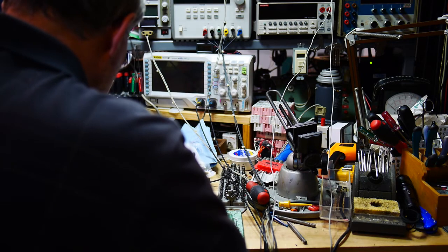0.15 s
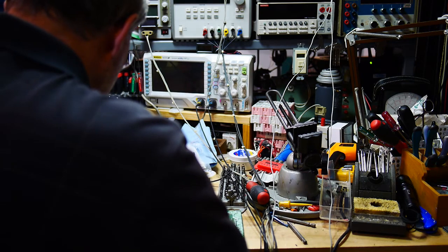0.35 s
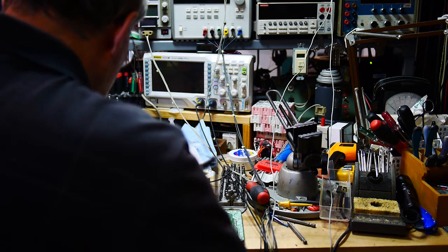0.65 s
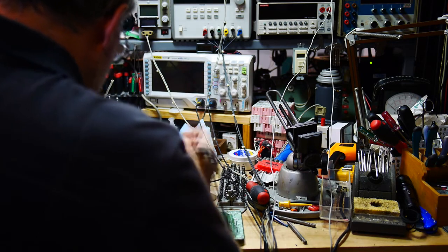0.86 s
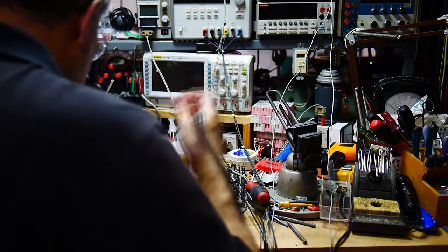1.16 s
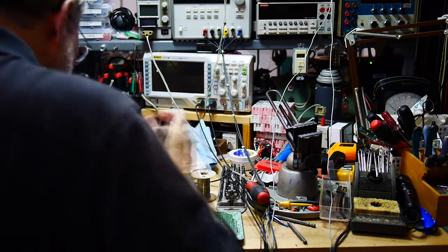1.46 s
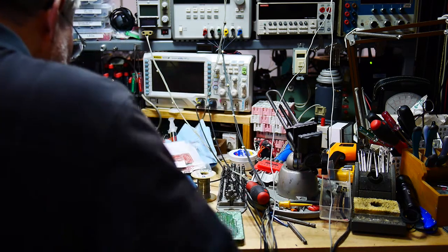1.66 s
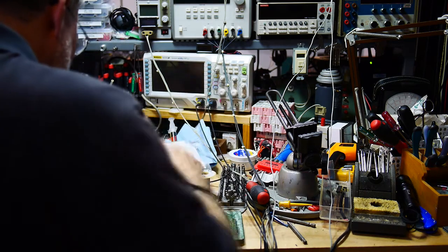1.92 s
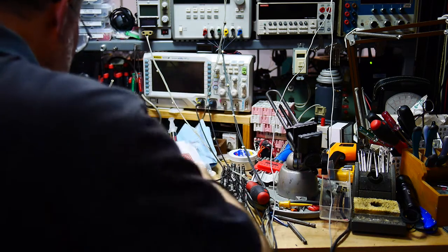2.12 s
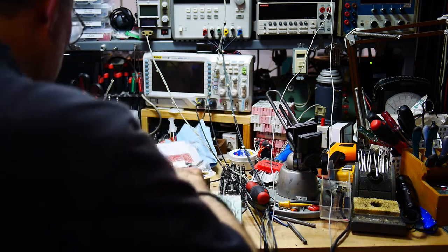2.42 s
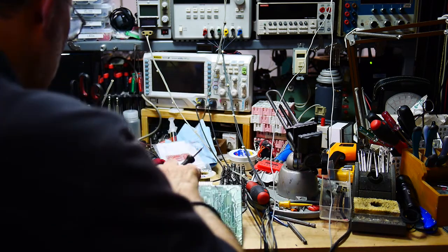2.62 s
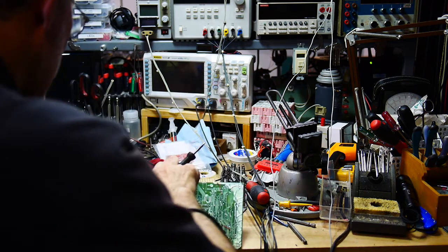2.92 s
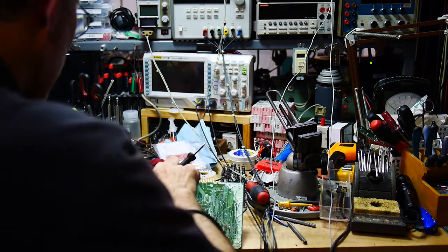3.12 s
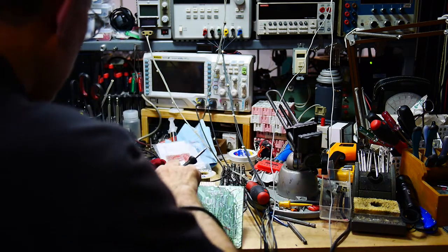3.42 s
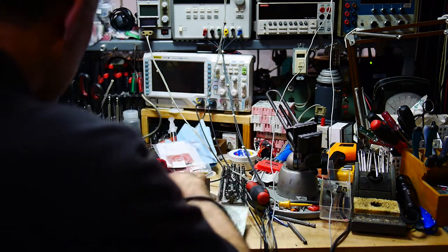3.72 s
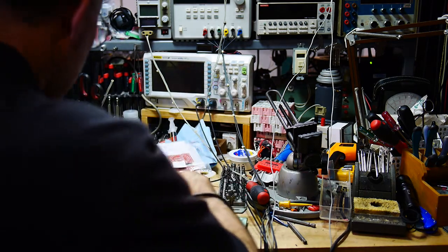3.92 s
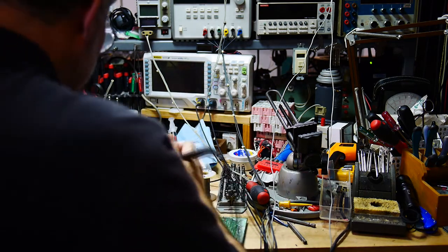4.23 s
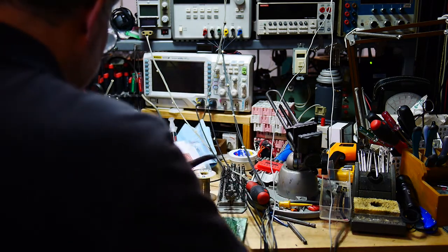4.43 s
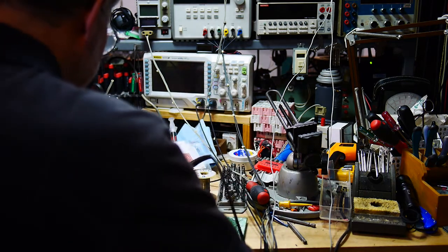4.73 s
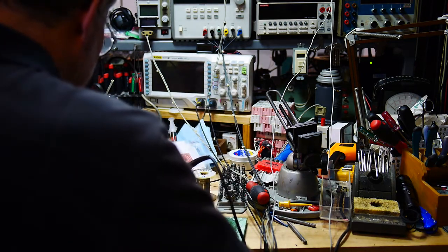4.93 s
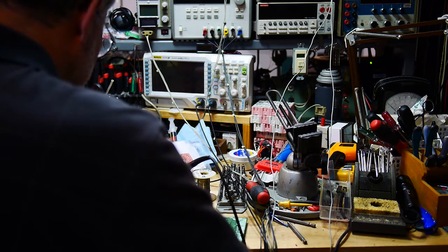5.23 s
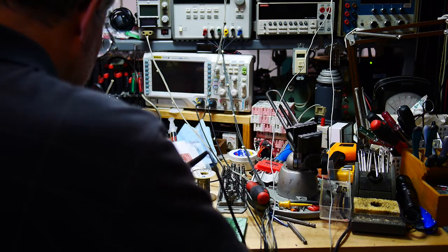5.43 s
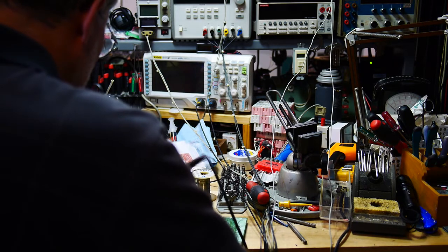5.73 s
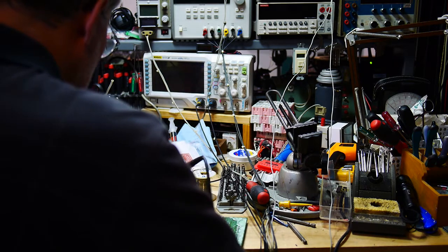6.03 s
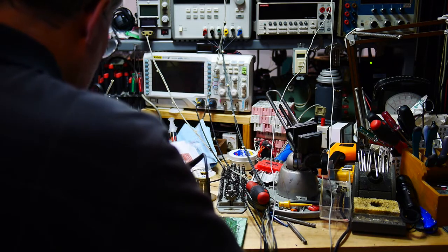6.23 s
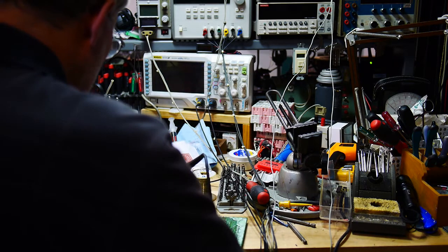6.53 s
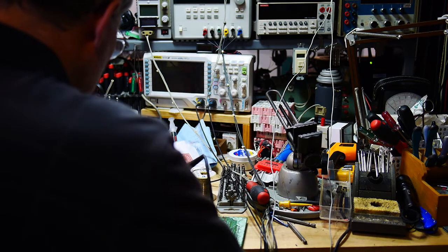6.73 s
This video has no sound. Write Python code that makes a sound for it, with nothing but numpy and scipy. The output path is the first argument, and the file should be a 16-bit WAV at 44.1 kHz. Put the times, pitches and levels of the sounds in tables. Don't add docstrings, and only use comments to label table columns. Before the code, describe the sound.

Sharp plastic-and-metal pump snap, hissing plunger push and very loud click, wooden knocks and scrapes on a bench, quiet pause, final snap.

```python
import sys
import numpy as np
from scipy import signal
from scipy.fft import rfft, irfft, next_fast_len
from scipy.io import wavfile
from scipy.ndimage import map_coordinates

SR = 44100
rng = np.random.default_rng(int(sys.argv[2]) if len(sys.argv) > 2 else 0)


def attenuation_scalar(level_db):
    decades = np.asarray(level_db, float) / 20
    return 10 ** decades


def master_out(mix):
    frames = np.transpose(np.atleast_2d(mix))
    ceiling = np.clip(frames, -1, 1)
    pcm = np.round(ceiling * 32767).astype(np.int16)
    wavfile.write(sys.argv[1], SR, pcm)


N = 302550
TAIL_N = 16384
PUMP_GROUPS = [(1800, 7500), (0, 1800), (7500, SR)]

# centre_hz, width_hz, level_db
BENCH_MODES = [(254, 72, -14.5), (400, 46, 0.3), (538, 100, 8.5), (690, 200, 6.5), (846, 360, 10.5),
               (1221, 120, 1.5), (1440, 250, -15), (2050, 360, -20.5), (2530, 340, -19), (3370, 160, -24),
               (4350, 460, -33.5)]
# centre_hz, width_hz, level_db
KNOB_MODES = [(400, 1400, -1.5), (800, 230, 4), (1310, 400, -7), (1880, 360, -6.5), (2900, 370, 1),
              (4200, 640, -7.5), (5400, 720, -6.5), (5940, 906, -3), (8550, 1480, -18), (9800, 1200, -4),
              (12200, 1500, -6)]


def unit(x):
    return x / np.sqrt(np.mean(x ** 2) + 1e-20)


def along(points, hz):
    f, v = np.transpose(points)
    return np.interp(np.log(hz + 1), np.log(f + 1), v)


def curve(points, outside=None):
    s, v = np.transpose(points)
    return np.interp(np.arange(N) / SR, s, v, outside, outside)


def wobble(rate):
    knots = rng.standard_normal(int(N * rate / SR) + 4)
    return map_coordinates(knots, [np.arange(N) * rate / SR])


def swell(peak_s, db, rise_s, fall_s):
    t = np.arange(N) / SR - peak_s
    return attenuation_scalar(db - 30 * np.maximum(-t / rise_s, t / fall_s))


def filtered(x, response):
    n = x.shape[-1]
    m = 2 * next_fast_len(n // 2 + 4096)
    return irfft(rfft(x, m) * response(np.fft.rfftfreq(m, 1 / SR)), m)[..., :n]


def body(modes):
    def response(f):
        power = sum(attenuation_scalar(2 * db) * (f * w) ** 2 / ((c * c - f * f) ** 2 + (f * w) ** 2) for c, w, db in modes)
        above = 1 + (f / (1.135 * modes[-1][0])) ** 6
        below = 1 + (0.7 * modes[0][0] / (f + 1)) ** 4
        power /= above * below
        cepstrum = irfft(np.log(power + 1e-12) / 2, 2 * len(f) - 2)
        cepstrum[1:len(f) - 1] *= 2
        cepstrum[len(f):] = 0
        return np.exp(rfft(cepstrum))
    return response


def rush(spectrum):
    # frequency_hz, likeness
    alike = [(60, 0.81), (150, 0.69), (380, 0.44), (950, 0.66), (2380, 0.54), (5980, 0.16), (15000, -0.22)]
    # frequency_hz, lead_rad
    lead = [(20, 0), (150, -.1), (600, -.43), (1200, -.85), (2400, -1.7), (5000, -2)]

    def mid_side(hz):
        turn = np.arccos(np.clip(along(alike, hz), -1, 1)) / 2
        return attenuation_scalar(along(spectrum, hz)) * np.array([np.cos(turn), np.sin(turn)])

    mid, side = filtered(rng.standard_normal((2, N)), mid_side)
    pair = np.array([mid + side, mid - side])
    return unit(filtered(pair, lambda hz: np.exp(.5j * along(lead, hz) * [[1], [-1]])))


def shop(near, spread, pan_db, wet_db):
    # frequency_hz, likeness
    coherence = [(100, .9), (700, 1), (2500, 0.3), (6000, 0.95), (12000, .6)]
    # frequency_hz, t60_s
    t60 = [(200, 0.66), (1000, 0.24), (4000, 0.31), (14000, .22)]
    # delay_s, level_db
    walls = [(.0045, -6), (.009, -11), (.014, -11), (.019, -13), (.027, -15)]
    # frequency_hz, share of the left-right dB
    shadow = [(700, 0.5), (3000, -0.77), (6000, 2.8), (13000, 3)]
    hz, t, z = signal.stft(rng.standard_normal((2, TAIL_N)), SR, nperseg=256)
    turn = np.arccos(np.clip(along(coherence, hz), -1, 1))[:, None] / 2
    z = np.cos(turn) * z[0] + np.sin(turn) * z[1] * [[[1]], [[-1]]]
    decay = attenuation_scalar(-60 * t / along(t60, hz)[:, None])
    tail = signal.istft(z * decay, SR, nperseg=256)[1][:, :TAIL_N]
    build_up = 1 - np.exp(-np.arange(TAIL_N) / (0.0032 * SR))
    tail *= attenuation_scalar(wet_db) / np.linalg.norm(tail[0]) * build_up
    early = np.zeros_like(tail)
    early[:, 0] = 1
    for delay_s, db in walls:
        early[[0, 1], round(delay_s * SR) + rng.integers(0, 4, size=2)] += attenuation_scalar(db)
    heard = signal.fftconvolve(near[None], early, axes=1) + signal.fftconvolve(spread[None], tail, axes=1)
    return filtered(heard, lambda hz: attenuation_scalar(pan_db / 2 * along(shadow, hz) * [[1], [-1]]))


def strikes(rows, modes, groups, scuff_s, pan_db, wet_db, trim_db):
    out = np.zeros((2, N + 2 * TAIL_N))
    t = np.arange(TAIL_N // 8) / SR
    impulse = 1. * (t == 0)
    rings = [filtered(impulse, body([m for m in modes if lo <= m[0] < hi])) for lo, hi in groups]
    rise = max(scuff_s, .002) / 9
    for s, db, *shares_db in rows:
        grit = rng.standard_normal(len(t)) * attenuation_scalar(2.7 * rng.standard_normal(len(t)))
        scuff = grit * (t / rise) ** 1.36 * np.exp(-1.3 * t / rise)
        blow = np.linalg.norm(scuff) * (np.arange(len(t)) == round(rise * SR))
        near_and_spread = 0
        for ring, share_db in zip(rings, [0, *shares_db]):
            part = signal.fftconvolve(np.array([scuff, blow]), ring[None], axes=1)
            near_and_spread = near_and_spread + attenuation_scalar(db + share_db + trim_db) * part / np.abs(part[0]).max()
        heard = shop(*near_and_spread, pan_db, wet_db)
        out[:, round((s - .7 * rise) * SR):][:, :heard.shape[1]] += heard
    return out[:, :N]


def rumble(bustle_db):
    # frequency_hz, level_db
    low_spectrum = [(12, -42.5), (20, -1.5), (32, -8), (54, 8.5), (91, 5), (105, -1.5), (140, -38),
                    (230, -120)]
    # peak_s, level_db
    jolts = [
        (.445, -53.5),
        (1.63, -62),
        (6.645, -61),
    ]
    thud = sum(swell(s, db, rise_s=.06, fall_s=.25) for s, db in jolts)
    steady = attenuation_scalar(-66.5 + bustle_db + 2.2 * wobble(6.9))
    return (steady + thud) * rush(low_spectrum)


def mains_hum(bustle_db):
    t = np.arange(N) / SR
    tone = np.sin(2 * np.pi * 120 * t + .7 * wobble(1.3)) * attenuation_scalar(3.4 * wobble(5.2))
    band = rush([(85, -36.5), (105, -9), (140, -1.5), (170, -33.5)])
    return attenuation_scalar(-69 + 0.84 * bustle_db) * (tone + 1.3 * band)


def fan_whirr(bustle_db):
    # frequency_hz, level_db
    whirr_spectrum = [(82, -57), (140, -21), (179, -5), (246, -5.5), (266, -6.5), (306, -2.5), (326, -4.5),
                      (366, -3.5), (559, -7.5), (612, -7), (1430, -10.5), (3000, -20.5), (3900, -53),
                      (6600, -120)]
    t = np.arange(N) / SR
    blade = attenuation_scalar(-18.5 + 1.2 * wobble(2.6)) * np.sin(2 * np.pi * 187 * t + 1.3 * wobble(7.3))
    return attenuation_scalar(-51.5 + 0.08 * bustle_db + .5 * wobble(3)) * (rush(whirr_spectrum) + blade)


def hiss(bustle_db):
    # frequency_hz, level_db
    hiss_spectrum = [(1180, -28.5), (2000, -6), (2610, -9), (3200, -9), (3520, -8.5), (5310, -10.5),
                     (6580, -9), (8220, -15.5), (9840, -13.5), (12800, -24.5), (15500, -31.5)]
    # peak_s, level_db, rise_s, fall_s
    hiss_lift = (2.37, -53, .15, 0.02)
    return (attenuation_scalar(-57.5 + .35 * bustle_db) + swell(*hiss_lift)) * rush(hiss_spectrum)


def fans():
    # time_s, level_db
    bustle = [(0, 1.5), (1.1, -0.5), (2.1, -1), (2.7, 2.5), (3.1, -4), (4.2, -4), (4.6, -9.5), (6.3, -15),
              (6.86, -4.5)]
    bustle_db = curve(bustle)
    return rumble(bustle_db) + mains_hum(bustle_db) + fan_whirr(bustle_db) + hiss(bustle_db)


def trigger():
    # start_s, peak_db, low_body_db, high_ring_db
    presses = [
        (0.3145, -16, -23, -4),
        (6.5405, -17, -20, -10.5),
    ]
    # centre_hz, width_hz, level_db
    button_modes = [(920, 100, -9), (2240, 570, 1.5), (2680, 300, 9.5), (4160, 130, 10), (4850, 150, 7),
                    (6060, 390, 8.5), (9600, 1700, 37), (13000, 990, -19.5)]
    return strikes(presses, button_modes, PUMP_GROUPS, scuff_s=.028, pan_db=1.5, wet_db=0.5, trim_db=-6)


def piston_slam():
    # start_s, peak_db, top_modes_db, rod_ring_db
    slams = [
        (0.4067, -15, 0.5, 5),
        (6.6235, -14.5, -1, -1.6),
    ]
    # delay_s, level under the slam_db, low_body_db, rod_ring_db, hollow_note_db
    rebounds = [(.003, -4.5, 0.5, -17, 4.5), (0.0103, -4.5, -27, -3.5, -25.5),
                (.018, 2.5, -15.5, -14.5, -3), (.0243, -3.5, -12.5, 2.5, -20.5),
                (.033, -12, -5.5, -2.5, -15), (0.048, -15, -11.5, -11, -25)]
    # centre_hz, width_hz, level_db
    barrel_modes = [(150, 116, -16.5), (380, 66, -7.5), (535, 57, -4), (875, 310, 1), (1268, 85, -6.5),
                    (2130, 260, -12.5), (2510, 150, -8), (2885, 110, -8.5), (3630, 1400, -3),
                    (4830, 890, -5.5), (5900, 800, -3.5), (7900, 3800, -22), (9570, 390, -12),
                    (10500, 570, -13.5), (11900, 1100, -18.5), (12960, 1000, -27)]
    groups = [(1800, 9000), (0, 1800), (9000, 10000), (10000, SR), (1800, 3200)]
    hits, bounces = [], []
    for s, db, top_db, ring_db in slams:
        hits.append((s, db, -5.5, -11.5 + ring_db, -11.5 + top_db, -17.5))
        for delay_s, under_db, low_db, rod_db, hollow_db in rebounds:
            bounces.append((s + delay_s, db + under_db, low_db, rod_db + ring_db, -11.5 + top_db, hollow_db))
    first = strikes(hits, barrel_modes, groups, scuff_s=.038, pan_db=3.0, wet_db=3.2, trim_db=-2.1)
    return first + strikes(bounces, barrel_modes, groups, scuff_s=.011, pan_db=0.8, wet_db=-2.0, trim_db=3.6)


def tool_ticks():
    # start_s, peak_db, low_body_db, high_ring_db, edge_db
    ticks = [(0.6355, -32.5, -4, -19, -6), (0.6938, -48.5, -7, 10, 13), (4.0165, -29.5, 1, -35, -19),
             (4.26, -37, 1, -1, -9), (4.67, -46, 5, -22.5, -17.5), (4.829, -27.5, -2, -26, -14),
             (4.839, -40, 11, -33, -17), (5.1243, -36, 3.5, -27, -19), (5.2126, -35, -0.5, -18, -13),
             (6.365, -41.5, -0.5, -17, -9)]
    # centre_hz, width_hz, level_db
    tool_modes = [(816, 150, -28), (1260, 220, -6), (1710, 910, -4), (2310, 200, -3.5), (4340, 590, -16),
                  (5140, 810, 6), (6240, 330, 8)]
    groups = [(1500, 3000), (0, 1500), (5600, SR), (3000, 5600)]
    return strikes(ticks, tool_modes, groups, scuff_s=.027, pan_db=2.0, wet_db=-3.0, trim_db=-5.0)


def rubbing():
    # firmest_s, level_db, rise_s, fall_s, rasp_db
    rubs = [(.644, -54.5, 0.14, 0.026, 4), (.72, -42.5, 0.082, 0.046, -6.5), (.78, -49.5, 0.015, 0.25, -25),
            (.932, -54, .012, .056, -9), (2.6, -51, 0.073, 0.21, -19), (2.684, -51.5, 0.24, 0.42, -23),
            (3.645, -44.5, 0.11, 0.14, -11.5), (3.69, -45.5, 0.15, 0.049, -30),
            (3.876, -34.5, 0.031, 0.04, -16), (4.06, -53, .015, .9, -29.5), (4.19, -47, .015, 0.034, -37),
            (4.276, -60, .05, 0.43, -29.5), (4.368, -49.5, 0.18, 0.041, -32)]
    # centre_hz, width_hz, level_db
    solder_modes = [(3550, 250, 0), (4150, 250, -2), (6200, 1800, -14), (11000, 4000, -17)]

    def grain():
        return rng.standard_normal(N) * attenuation_scalar(2.7 * wobble(90))

    rub = sum(swell(*row[:4]) for row in rubs)
    rasp = sum(attenuation_scalar(row[4]) * swell(*row[:4]) for row in rubs)
    wood = unit(filtered(grain(), body([mode for mode in BENCH_MODES if mode[0] < 2200])))
    grit = unit(filtered(grain(), body(solder_modes)))
    sound = attenuation_scalar(-3.5) * (rub * wood + rasp * grit)
    return shop(sound, sound, pan_db=1.5, wet_db=1.5)[:, :N]


def bench_knocks():
    # start_s, peak_db, middle_db, edge_db
    knocks = [(0.696, -26, -10, -4.5), (0.783, -33.5, -7, -8), (0.93, -40, -2, -8), (1.531, -46, -12, 3),
              (1.557, -42, -17, 2), (1.879, -23.5, -17, 1), (1.898, -39.5, 12, 0),
              (2.179, -16.5, -0.5, -5.5), (2.184, -13, -7, -12), (2.192, -19.5, -14, -4.5),
              (2.197, -26, -14, -22), (2.236, -24, 1, -7), (2.254, -25, -11, -9.5), (2.299, -44, 9.5, -3),
              (2.655, -47, -18, -23), (3.689, -23.5, -24, -37), (3.897, -23, 1.5, -34.5),
              (3.901, -25, -17, -16), (4.019, -32, 3, -3.5), (4.05, -34, -12, -13),
              (4.188, -36.5, -2.5, -6), (4.279, -32.5, -4, -14), (4.354, -36, -4, -14),
              (4.525, -39.5, -3, -12)]
    groups = [(0, 1000), (1000, 1800), (1800, SR)]
    return strikes(knocks, BENCH_MODES, groups, scuff_s=.024, pan_db=-1.7, wet_db=-1.5, trim_db=-3.0)


def piston_air():
    # time_s, level_db
    strokes = [
        [(1.44, -65), (1.486, -37), (1.49, -54)],
        [(1.53, -37), (1.584, -50), (1.606, -41), (1.616, -23.5), (1.618, -46)],
        [(1.795, -33), (1.805, -32.5), (1.827, -27.5), (1.895, -34), (1.931, -62), (1.98, -65)],
    ]
    # frequency_hz, level_db
    air_spectrum = [(410, -34), (700, -13.5), (1090, -5.5), (1370, -15.5), (2000, -8), (3490, -5),
                    (5860, -1), (13400, -8), (15500, -29)]
    push = sum(attenuation_scalar(curve(points, -120)) for points in strokes)
    resonance = body(KNOB_MODES)

    def colour(hz):
        return attenuation_scalar(along(air_spectrum, hz)) * (1 + 1.9 * np.abs(resonance(hz)))

    air = unit(filtered(rng.standard_normal(N), colour))
    sound = attenuation_scalar(-3.5) * push * air * attenuation_scalar(1.9 * wobble(250))
    return shop(sound, sound, pan_db=1.5, wet_db=1.5)[:, :N]


def thumb_grip():
    # start_s, peak_db, low_body_db, high_ring_db
    grips = [
        (1.493, -20.5, 1.5, -3),
        (1.4961, -13.5, -12, -1),
    ]
    return strikes(grips, KNOB_MODES, PUMP_GROUPS, scuff_s=0.0067, pan_db=1.46, wet_db=0.0, trim_db=-3.5)


def latch():
    # start_s, peak_db, low_body_db, high_ring_db
    clicks = [(1.6219, -1, -15.5, -28), (1.6258, -1.5, -37.5, -3), (1.6408, -14, -10.5, -23.5)]
    # centre_hz, width_hz, level_db
    held_modes = [(350, 140, -11), (750, 280, -13), (1172, 160, -4), (1970, 400, -8), (2550, 280, -7),
                  (3097, 900, -5.5), (4170, 210, -5.5), (5030, 220, -6.5), (5850, 380, 1.7),
                  (6900, 4500, -19), (8610, 380, -9.5), (9560, 300, -1.5), (11500, 2700, -12),
                  (13200, 880, -5.5)]
    return strikes(clicks, held_modes, PUMP_GROUPS, scuff_s=.007, pan_db=1.2, wet_db=-0.7, trim_db=-0.6)


def knob_return():
    # start_s, peak_db, low_body_db, high_ring_db
    returns = [(1.7798, -20, -6.5, -19), (1.7838, -11, -15.5, -9), (2.0078, -32.5, -8, -28)]
    return strikes(returns, KNOB_MODES, PUMP_GROUPS, scuff_s=.02, pan_db=1.5, wet_db=0.0, trim_db=-3)


def scene():
    firing = trigger() + piston_slam()
    cocking = piston_air() + thumb_grip() + latch() + knob_return()
    clutter = tool_ticks() + rubbing() + bench_knocks()
    return fans() + firing + clutter + cocking


def band_limit(x):
    return signal.sosfilt(signal.butter(12, 16450, fs=SR, output="sos"), x)


def record(dry):
    # frequency_hz, level_db
    microphone = [(20, 0.5), (14000, -2.5), (15000, -6), (15700, -14), (16500, -51.5)]
    heard = filtered(dry, lambda hz: attenuation_scalar(along(microphone, hz)))
    mix = np.clip(heard, -1, 1)
    return band_limit(mix)


dry = scene()
out = record(dry)
master_out(out)
```